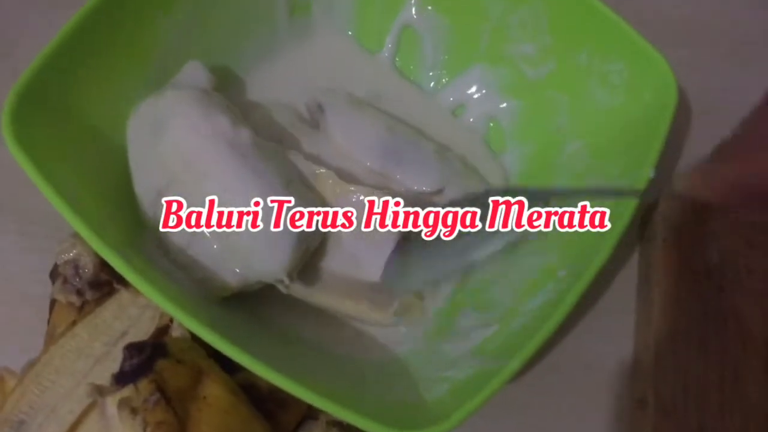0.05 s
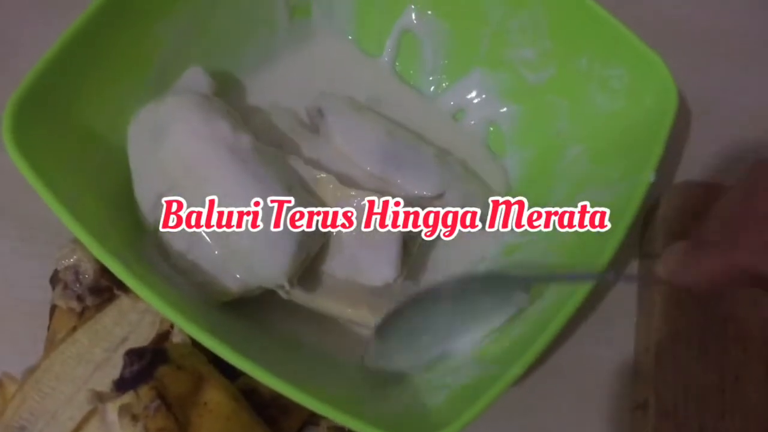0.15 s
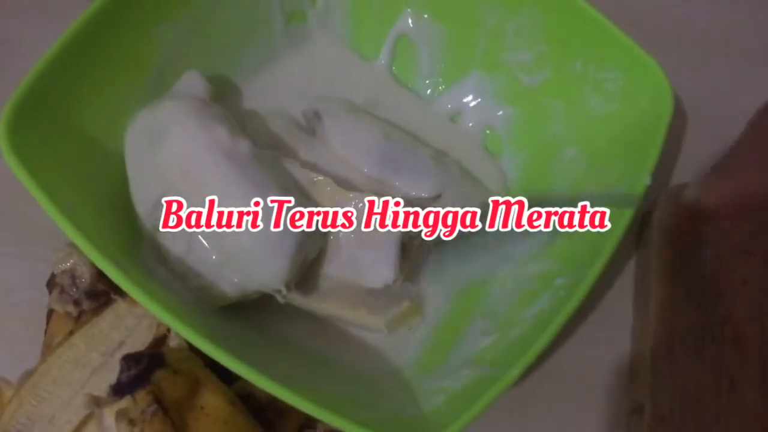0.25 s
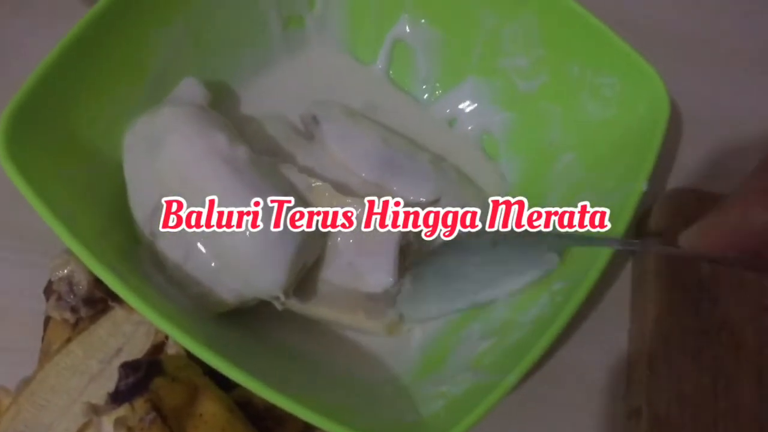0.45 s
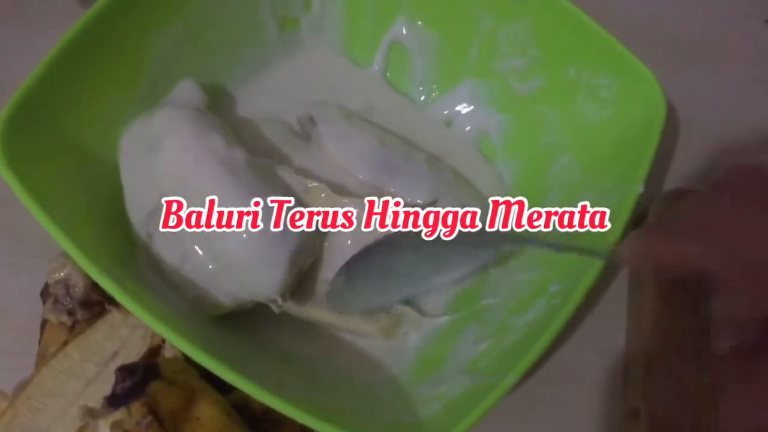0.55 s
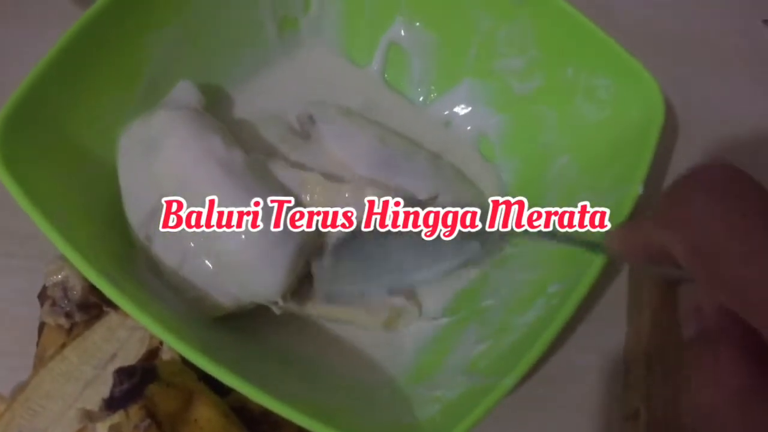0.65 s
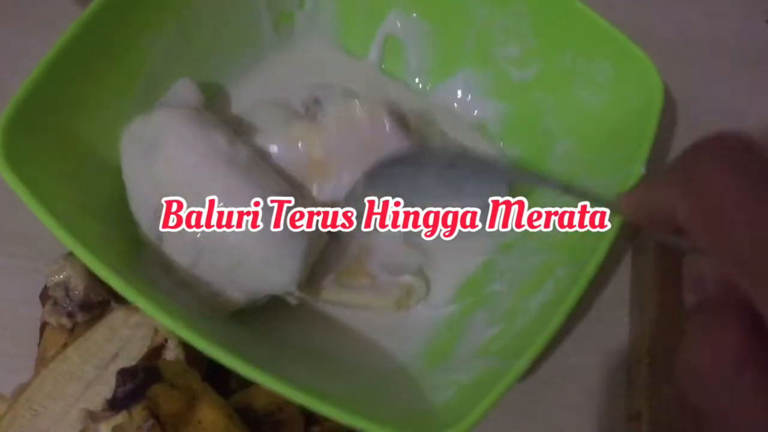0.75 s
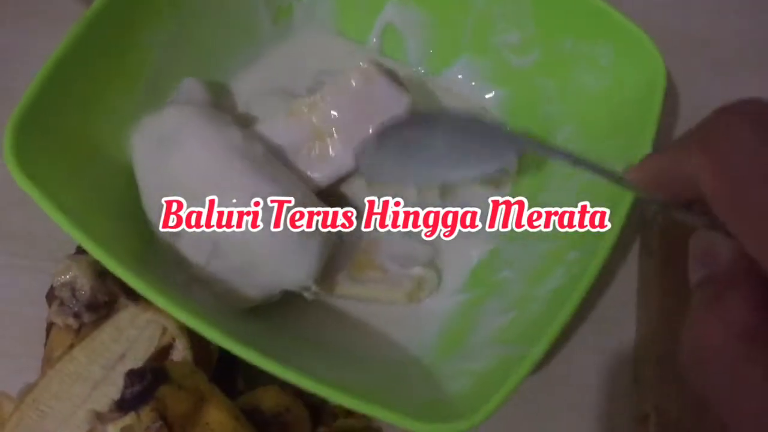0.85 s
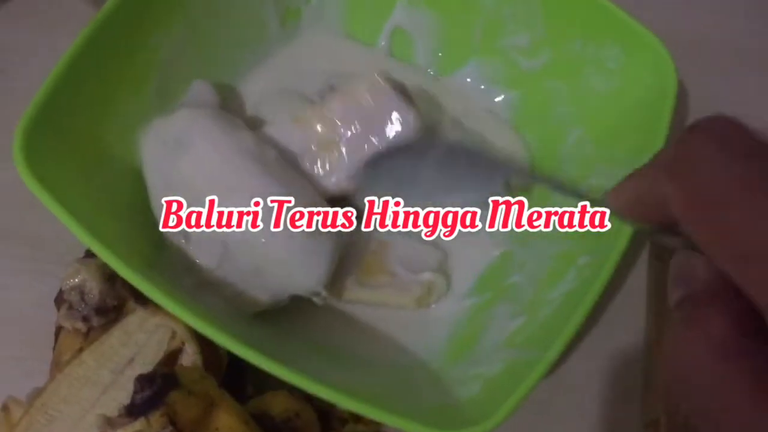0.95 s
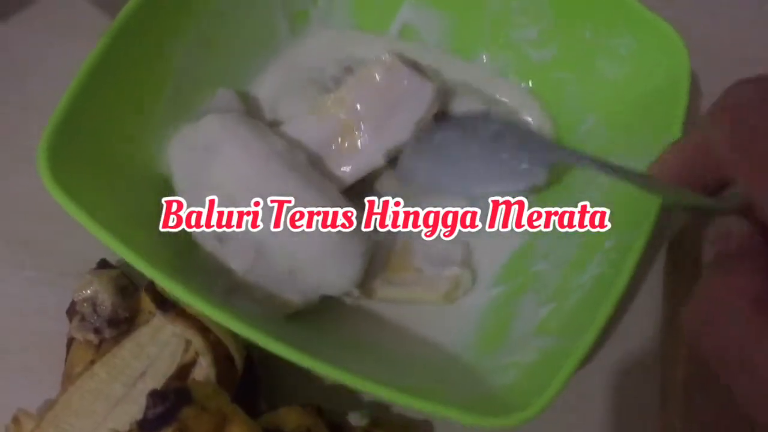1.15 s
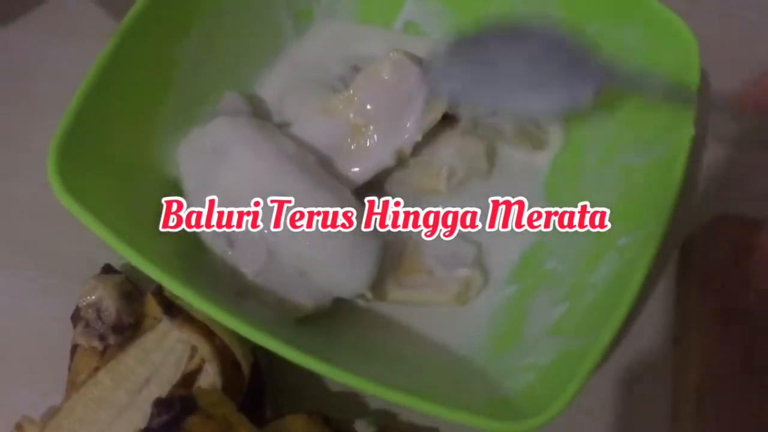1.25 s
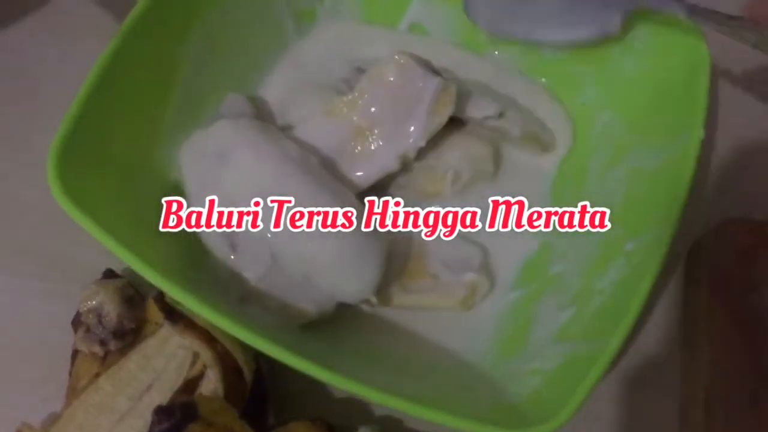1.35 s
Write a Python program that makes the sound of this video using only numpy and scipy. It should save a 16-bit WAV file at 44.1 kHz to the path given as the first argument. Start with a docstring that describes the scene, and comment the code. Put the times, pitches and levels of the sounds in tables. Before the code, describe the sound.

Sharp hollow spoon knocks against a plastic bowl, with short wet batter scrapes between them

```python
"""A metal spoon stirs batter and fruit in a plastic bowl, close up in a small kitchen.
Over steady air noise and a wavering hum, the spoon first rubs the wall: gliding hollow noise with a rasp.
Knocks at 0.21, 0.49 and 1.11 s ring the bowl's decaying modes; wet scrapes of grainy noise run between,
with sticky clicks and further rubs. Soft low bumps come at 0.68 s and near the end.
Noise-built reverberation answers throughout, and the loudest peaks are rounded off."""
import sys
import numpy as np
from scipy import signal
from scipy.fft import rfft, irfft
from scipy.io import wavfile

SR = 44100
rng = np.random.default_rng(int(sys.argv[2]) if len(sys.argv) > 2 else 0)


def store_wav(level_fs):
    """Save 16-bit WAV to argv[1]."""
    pcm = np.round(np.clip(np.atleast_2d(level_fs), -1, 1) * 32767)
    wavfile.write(sys.argv[1], SR, pcm.T.astype(np.int16))


N = 61740

# All levels are relative to the stage they feed.
# Room noise spectrum. Each row: frequency in Hz, gain in dB.
AIR_SPECTRUM = [(20, -27), (35, -26), (55, -1.5), (80, 0), (150, -3.5), (300, -6), (450, -15.5), (650, -23),
                (1000, -13.5), (1600, -12.5), (2500, -18.5), (3500, -18.5), (5000, -30.5), (8000, -35),
                (16000, -37.5)]
# Hum level over time. Each row: time in seconds, level in dB.
HUM_LEVELS = [(0, -66), (.6, -54), (.7, -56), (.85, -59), (.98, -46.5), (1.13, -48), (1.25, -54),
              (1.4, -48.5)]
# Rubs along the wall. Each row: start in seconds, level in dB, attack in seconds, decay in seconds,
# hollow resonance in Hz, its glide in Hz per second, rasp level in dB.
RUB_STROKES = [(0, -34, 0.0033, 0.064, 1099, -2000, -46.5), (0.04, -34, 0.021, 0.0073, 914, 0, -50),
               (.175, -43.5, 0.036, 0.06, 993, 0, -61), (0.227, -25, 0.0041, 0.042, 1145, 2, -58),
               (.277, -26.5, 0.013, .004, 1183, 0, -23), (.321, -27.5, 0.0041, 0.0071, 1200, 0, -44),
               (0.33, -31, 0.0085, .005, 1490, 6000, -40), (.405, -39.5, 0.01, 0.059, 1083, 5, -44),
               (.519, -22.5, 0.0045, .012, 1483, -6000, -33), (1.119, -36.5, 0.022, 0.034, 1255, 2495, -52),
               (1.168, -35.5, .022, 0.015, 1558, 7000, -51)]
# Hollow rub spectrum. Each row: frequency in Hz, gain in dB.
RUB_SPECTRUM = [(150, -11), (450, -3), (750, 1), (1800, -0.5), (2500, -7), (5000, -10.5), (16000, -14.5)]
# Rasp spectrum. Each row: frequency in Hz, gain in dB.
RASP_SPECTRUM = [(900, -35), (1900, -3), (2500, 1), (3300, -8), (4400, -7.5), (5500, -23), (10000, -45),
                 (16000, -43)]
# Rasp resonances. Each row: frequency in Hz, width in Hz, gain in dB.
RASP_PEAKS = [(2340, 140, 6.5), (2630, 99, 1), (3370, 90, 6), (3850, 120, -12), (9900, 140, -21)]
# Sticky clicks of batter. Each row: start in seconds, level in dB.
BATTER_CLICKS = [(.059, -64), (.751, -50), (.868, -36.5), (1.249, -49.5)]
# Fizz spectrum, shared by clicks and crackle. Each row: frequency in Hz, gain in dB.
FIZZ_SPECTRUM = [(1500, -13), (4000, -1), (5000, -4), (5800, 4), (6600, -1), (8200, 2.5), (10200, -4.5),
                 (12500, -0.5), (16000, -5.5)]
# Knocks on the bowl. Each row: start in seconds, level in dB, contact tick in dB, room send in dB.
BOWL_KNOCKS = [(.2141, 1.5, -11.5, -5.5), (0.4899, 2.5, -12, -4), (1.1064, 2.5, -29.5, -5.5)]
# Bowl modes, driven differently at each place of contact. Each row: frequency in Hz, T60 in seconds,
# drive in dB at the first, second and third knock.
BOWL_MODES = [(142, 0.026, -25, -30, -36), (296.3, 0.063, -25.5, -23, -52), (450, 0.027, -31, -22, -45.5),
              (605, 0.034, -44, -24.5, -29), (749, 0.035, -14, -15, -32), (896, 0.035, -8.5, -7.5, -26.5),
              (1016, 0.032, -22, -33, -18.5), (1298, 0.024, -6.5, -26, -14.5),
              (1465, 0.012, 1.5, -10.5, -21.5), (1733, 0.025, -9.5, -9, -19.5),
              (1964, 0.023, -23, -31, -18), (2301, 0.019, -17.5, -13.5, -35),
              (2710, 0.015, -19, -25, -19.5), (3264, 0.017, -30, -15, -27.5),
              (3815, 0.0089, -23, -15, -23.5), (4360, 0.0089, -14, -18, -45), (5690, 0.0091, -32, -15, -34),
              (6040, 0.0075, -22, -24, -46), (10140, 0.023, -31, -50, -58)]
# Contact tick spectrum. Each row: frequency in Hz, gain in dB.
TICK_SPECTRUM = [(300, 3), (1000, -14), (3000, 9), (6000, -10.5), (8500, -12), (12000, -8.5),
                 (16000, -14.5)]
# Radiation of knocks into the room. Each row: frequency in Hz, gain in dB.
KNOCK_RADIATION = [(200, 4.5), (800, 0.5), (1700, -2), (2800, 1), (4500, 3), (6500, 4), (10000, 9),
                   (16000, -6)]
# Wet scrapes. Each row: start in seconds, level in dB, attack in seconds, decay in seconds,
# low slop level in dB, fizz level in dB.
WET_SCRAPES = [(0.3666, -30, 0.0051, 0.012, -36, -31), (0.6622, -34.5, 0.0033, 0.014, -46, -35.5),
               (.699, -46, 0.006, 0.011, -63, -54), (0.746, -49, 0.0045, 0.027, -57, -59),
               (0.788, -43.5, .008, 0.018, -63, -52), (0.8042, -31, 0.0037, 0.012, -36, -38),
               (0.861, -41.5, 0.0095, 0.013, -49, -62), (0.9725, -42, 0.0028, 0.02, -43, -44.5),
               (.995, -51.5, 0.015, 0.027, -47.5, -47.5), (1.023, -36.5, .011, 0.013, -43, -34),
               (1.059, -34, .005, 0.0087, -45.5, -40.5), (1.091, -45, 0.0037, 0.0052, -67, -74)]
# Resonances rung by a scrape. Each row: frequency in Hz, width in Hz, gain in dB.
SCRAPE_PEAKS = [(1026, 45, 3), (1295, 60, -7), (1605, 125, -1.5), (2406, 47, 1), (3260, 105, -1),
                (3770, 96, -5), (5430, 320, -11.5), (7400, 64, -5), (8060, 140, -25)]
# Scrape spectrum beneath the resonances. Each row: frequency in Hz, gain in dB.
SCRAPE_SPECTRUM = [(300, -36), (900, -27), (2000, -11), (3300, -11), (5000, -18), (8000, -22), (16000, -47)]
# Low slop spectrum. Each row: frequency in Hz, gain in dB.
SLOP_SPECTRUM = [(80, -11.5), (200, -16), (350, -4.5), (620, -6.5), (1000, -11), (2500, -49)]
# Bumps of the bowl on the table. Each row: start in seconds, level in dB.
BOWL_BUMPS = [(.68, -54), (1.27, -46.5), (1.344, -45), (1.38, -38)]
# Bump spectrum. Each row: frequency in Hz, gain in dB.
BUMP_SPECTRUM = [(40, -22), (70, 0), (110, -4), (160, 3), (230, -21), (500, -33), (2000, -60)]
# Kitchen reverberation bands. Each row: centre in Hz, level in dB, T60 in seconds.
ROOM_BANDS = [(150, -7.5, 0.32), (395, -4, 0.34), (854, -6, 0.35), (1620, -7, 0.37), (3260, -8.5, 0.27),
              (6600, -13.5, 0.27), (15000, -17.5, 0.37)]

AIR_DB = -49.5
HUM_HZ, HUM_WIDTH_HZ, HUM_WAVER_DB = 157, 12, 1
RUB_WIDTH_HZ, RUB_GRAIN_DB = 820, 2
CLICK_DECAY_S = 0.0016
PUSH_S, WALL_LAG_S = 0.00048, 0.000397  # time the wall takes to give; its lag behind first touch
TICK_DECAY_S, SNAP_WIDTH_S, SNAP_DB = 0.0013, 0.00006, 3.5
GRAIN_S, SCRAPE_GRAIN_DB = 0.0006, 4.5
CRACKLE_PER_S, CRACKLE_SPREAD_DB, CRACKLE_DB = 530, 5, -9.5
BUMP_RISE_S, BUMP_DECAY_S = 0.0046, 0.03
STIRRING_ROOM_DB = 7
ROOM_BUILD_S, WORKTOP_DB, WORKTOP_DECAY_S = 0.0035, -26.5, 0.0039
DRIVE, TOP_HZ = 1, 15900  # rounding amplitude; upper band edge


def undb(db):
    """Amplitude from dB."""
    return 10 ** (np.asarray(db) / 20)


def unit(x):
    """Scale to rms 1."""
    return x / np.sqrt(np.mean(x ** 2) + 1e-20)


def seconds():
    """Time of every sample."""
    return np.arange(N) / SR


def bins_hz():
    """Frequencies of the spectrum, floored at 1 Hz."""
    return np.maximum(np.fft.rfftfreq(N, 1 / SR), 1)


def colour(points):
    """Gain at every frequency, in dB linear over log frequency between points."""
    hz, db = np.array(points).T
    return undb(np.interp(np.log(bins_hz()), np.log(hz), db))


def resonances(peaks):
    """Gain at every frequency from resonant peaks summed in power."""
    f = bins_hz()
    power = 0
    for hz, width_hz, db in peaks:
        power = power + undb(db) ** 2 / (1 + ((f * f - hz * hz) / (f * width_hz)) ** 2)
    return np.sqrt(power)


def filtered(x, gain):
    """Apply a gain per frequency."""
    return irfft(rfft(x) * gain, N)


def noise(gain, grain_db=0):
    """Coloured noise of rms 1, made of short grains of uneven size."""
    sizes = np.interp(seconds() / GRAIN_S, np.arange(N), rng.standard_normal(N))
    grains = rng.standard_normal(N) * undb(grain_db * sizes)
    return unit(filtered(grains, gain))


def swell(start_s, attack_s, decay_s):
    """A straight rise and an exponential fall."""
    since = seconds() - start_s
    rise = np.clip(since / max(attack_s, 1 / SR), 0, 1)
    return rise * np.exp(-np.maximum(since - attack_s, 0) / decay_s)


def background():
    """Room noise plus a hum: a steady sine and narrowband noise that makes it waver."""
    t = seconds()
    waver = noise(1 / (1 + ((bins_hz() - HUM_HZ) / HUM_WIDTH_HZ) ** 2))
    hum = unit(np.sin(2 * np.pi * HUM_HZ * t) + undb(HUM_WAVER_DB) * waver)
    hum_level = undb(np.interp(t, *np.array(HUM_LEVELS).T))
    return undb(AIR_DB) * noise(colour(AIR_SPECTRUM)) + hum * hum_level


def rubs():
    """Spoon sticks and slips on the wall: noise on a gliding carrier sounds hollow, with a ringing rasp."""
    t = seconds()
    lowpass = 1 / np.hypot(1, 2 * bins_hz() / RUB_WIDTH_HZ)
    in_phase = noise(lowpass, RUB_GRAIN_DB)
    quadrature = noise(lowpass, RUB_GRAIN_DB)
    hollow, pressure = 0, 0
    for start_s, db, attack_s, decay_s, hz, glide_hz_per_s, rasp_db in RUB_STROKES:
        stroke = swell(start_s, attack_s, decay_s)
        since = t - start_s
        phase = 2 * np.pi * (hz + glide_hz_per_s * since / 2) * since
        carried = in_phase * np.sin(phase) + quadrature * np.cos(phase)
        hollow = hollow + undb(db) * stroke * carried
        pressure = pressure + undb(rasp_db) * stroke
    rasp = noise(np.hypot(colour(RASP_SPECTRUM), resonances(RASP_PEAKS)), RUB_GRAIN_DB)
    return filtered(hollow, colour(RUB_SPECTRUM)) + pressure * rasp


def clicks():
    """Threads of batter snap: abrupt, fast-decaying bursts of fizz-coloured noise."""
    level = sum(undb(db) * swell(start_s, 0, CLICK_DECAY_S) for start_s, db in BATTER_CLICKS)
    return noise(colour(FIZZ_SPECTRUM)) * level


def knock(place):
    """Metal snaps and ticks on plastic, then the wall gives and its modes ring briefly."""
    start_s, db, tick_db, _ = BOWL_KNOCKS[place]
    since = seconds() - start_s
    t = np.maximum(since - WALL_LAG_S, 0)
    ring = 0
    for k, (hz, t60_s, *drive_db) in enumerate(BOWL_MODES):
        # each mode a quarter turn behind the last
        mode = np.sin(2 * np.pi * hz * t - k * np.pi / 2) * np.exp(-np.log(1000) * t / t60_s)
        ring = ring + undb(drive_db[place]) * mode
    give = 1 - np.exp(-t / PUSH_S)
    x = since / SNAP_WIDTH_S
    snap = 2 * undb(SNAP_DB) * x * np.exp(-x ** 2)
    hiss = noise(colour(TICK_SPECTRUM)) * swell(start_s, 0, TICK_DECAY_S)
    return undb(db) * (ring * give + undb(tick_db) * (snap + hiss))


def crackle():
    """Tiny air pockets burst in the batter: random pulses of uneven size and either sign."""
    bursts = rng.random(N) < CRACKLE_PER_S / SR
    sizes = undb(CRACKLE_SPREAD_DB * np.clip(rng.standard_normal(N), -2, 2))
    signs = np.sign(rng.standard_normal(N))
    return unit(filtered(bursts * sizes * signs, colour(FIZZ_SPECTRUM)))


def scrapes():
    """Dense grains ring spoon and bowl, with low slop of batter and wet, crackling fizz."""
    ringing = np.hypot(resonances(SCRAPE_PEAKS), colour(SCRAPE_SPECTRUM))
    body = noise(ringing, SCRAPE_GRAIN_DB)
    slop = noise(colour(SLOP_SPECTRUM), SCRAPE_GRAIN_DB)
    fizz = noise(colour(FIZZ_SPECTRUM), SCRAPE_GRAIN_DB)
    fizz = unit(fizz + undb(CRACKLE_DB) * crackle())
    total = 0
    for start_s, db, attack_s, decay_s, slop_db, fizz_db in WET_SCRAPES:
        mix = undb(db) * body + undb(slop_db) * slop + undb(fizz_db) * fizz
        total = total + swell(start_s, attack_s, decay_s) * mix
    return total


def bumps():
    """Pushed by the spoon, the bowl rocks dully on the table: soft swells of low noise."""
    level = sum(undb(db) * swell(start_s, BUMP_RISE_S, BUMP_DECAY_S) for start_s, db in BOWL_BUMPS)
    return noise(colour(BUMP_SPECTRUM)) * level


def kitchen():
    """Room impulse response: quick scatter off the worktop and a tail decaying separately in each band."""
    t = seconds()
    hz, db, t60_s = np.array(ROOM_BANDS).T
    white = rng.standard_normal(N)
    tail = 0
    for k, own in enumerate(np.eye(len(hz))):
        # overlapping triangular bands over log frequency
        band = filtered(white, np.interp(np.log(bins_hz()), np.log(hz), own))
        fall = (1 - np.exp(-t / ROOM_BUILD_S)) * np.exp(-np.log(1000) * t / t60_s[k])
        tail = tail + undb(db[k]) * band * fall / np.linalg.norm(fall)
    early = rng.standard_normal(N) * swell(0.0016, 0.0011, WORKTOP_DECAY_S)
    return tail + undb(WORKTOP_DB) * early / np.linalg.norm(early)


def scene():
    """Knocks, rubs and stirring, direct and through the room, with bumps and background direct only."""
    rubbing = rubs()
    hits = [knock(k) for k in range(len(BOWL_KNOCKS))]
    stirring = scrapes() + clicks()
    sent = sum(hit * undb(row[3]) for hit, row in zip(hits, BOWL_KNOCKS))
    radiated = filtered(sent, colour(KNOCK_RADIATION))
    into_room = radiated + undb(STIRRING_ROOM_DB) * stirring + rubbing
    room = signal.fftconvolve(into_room, kitchen())[:N]
    return (sum(hits) + stirring + rubbing + room + bumps() + background())[None]


def record(dry):
    """The recorder rounds the loudest peaks and cuts the top with a steep low-pass."""
    rounded = dry / (1 + (dry / DRIVE) ** 4) ** (1 / 4)
    lowpass = signal.ellip(8, 0.2, 80, TOP_HZ, fs=SR, output="sos")
    return signal.sosfilt(lowpass, rounded)


dry = scene()
out = record(dry)
store_wav(out)
```